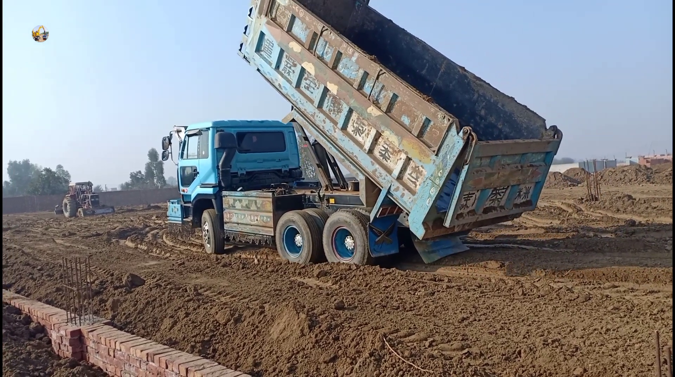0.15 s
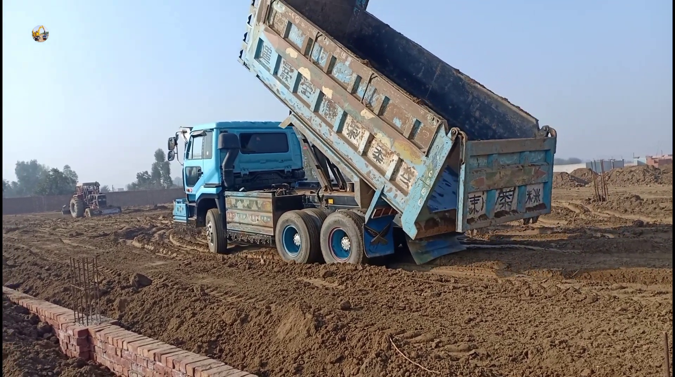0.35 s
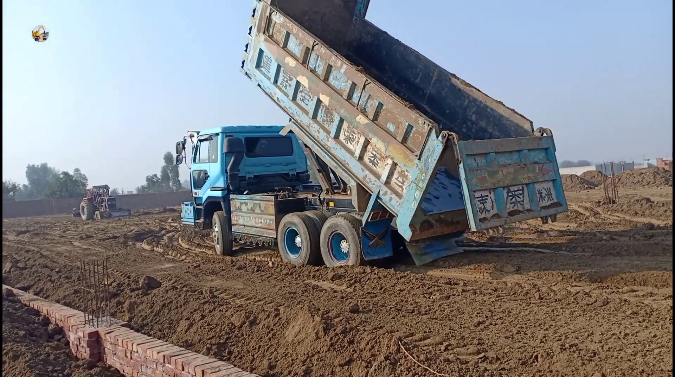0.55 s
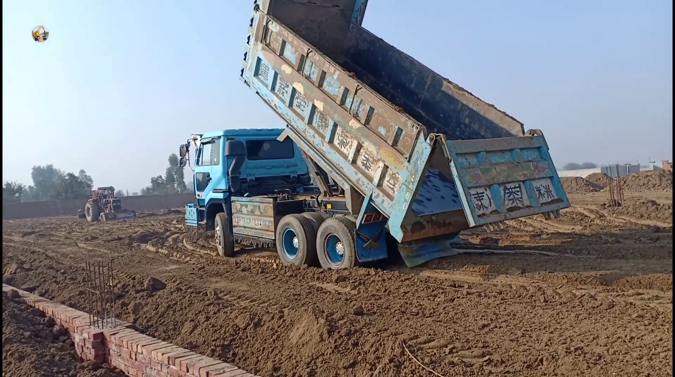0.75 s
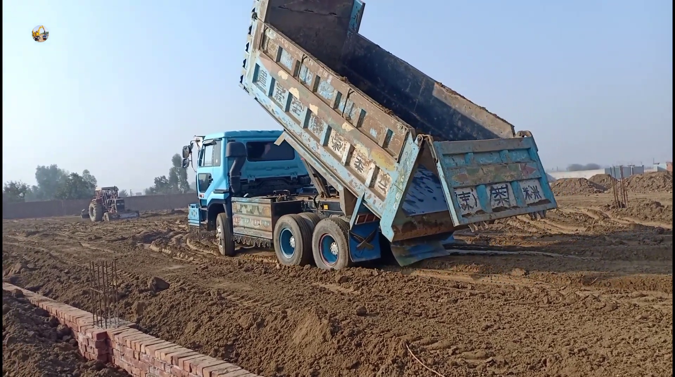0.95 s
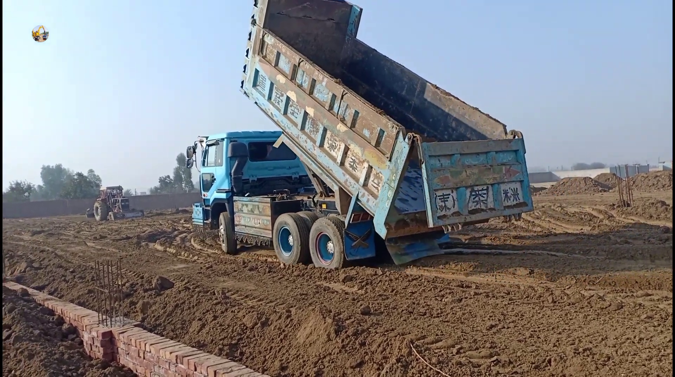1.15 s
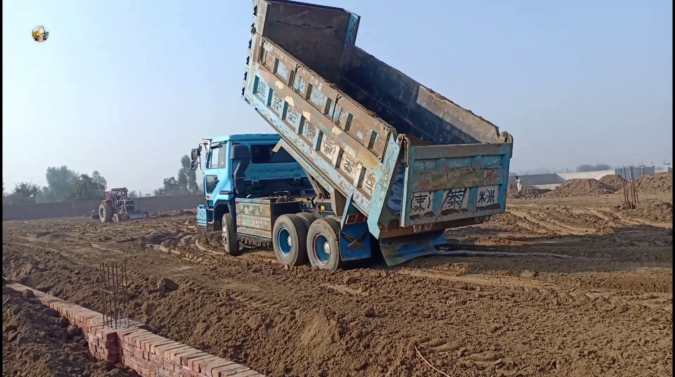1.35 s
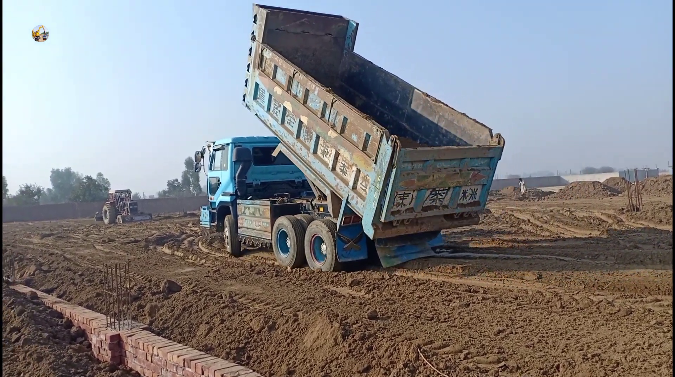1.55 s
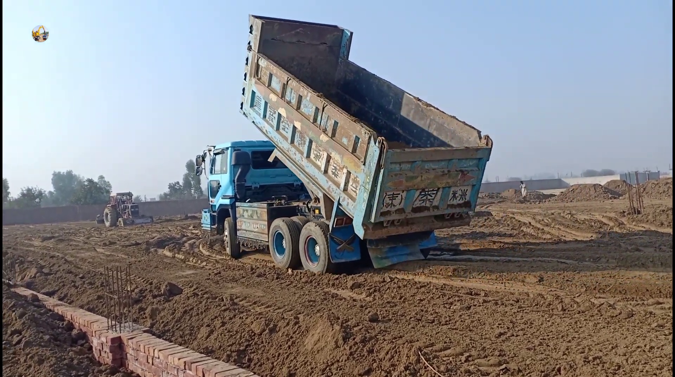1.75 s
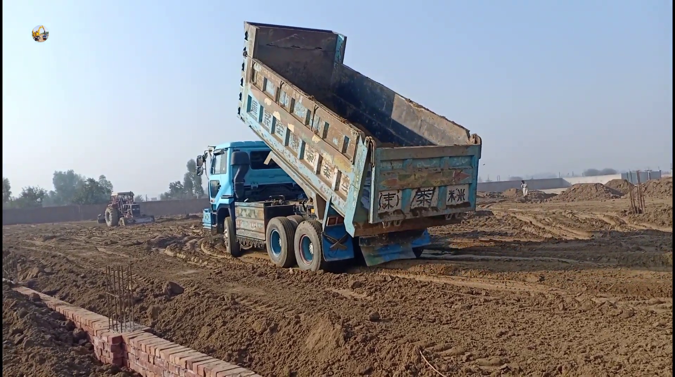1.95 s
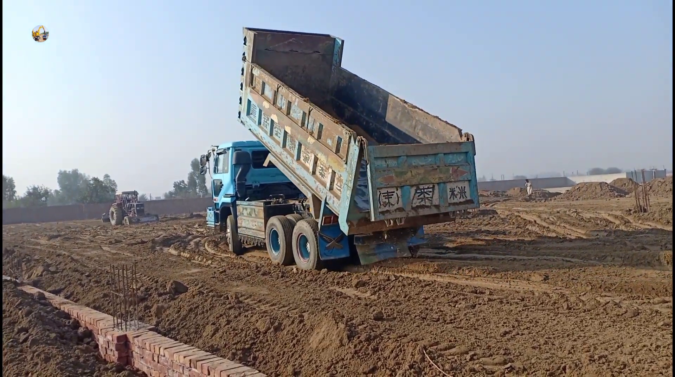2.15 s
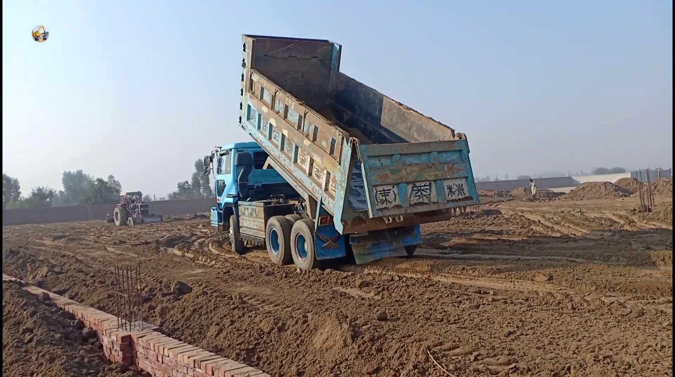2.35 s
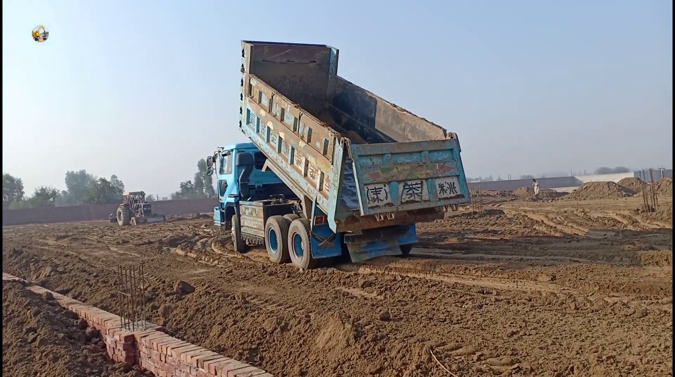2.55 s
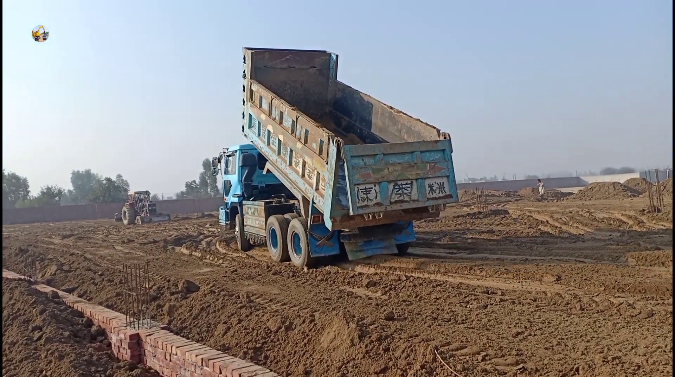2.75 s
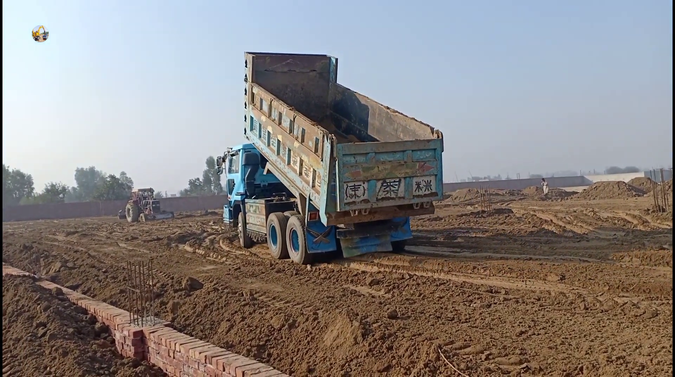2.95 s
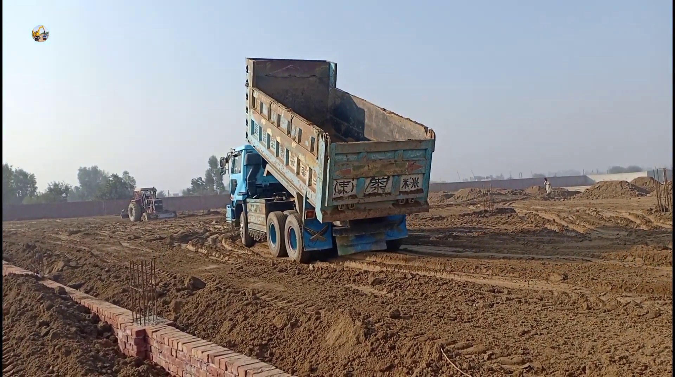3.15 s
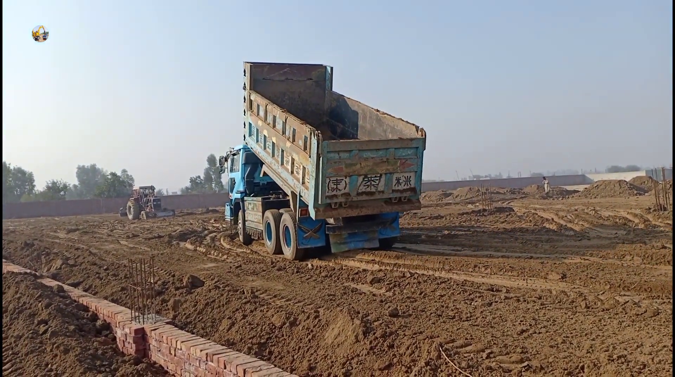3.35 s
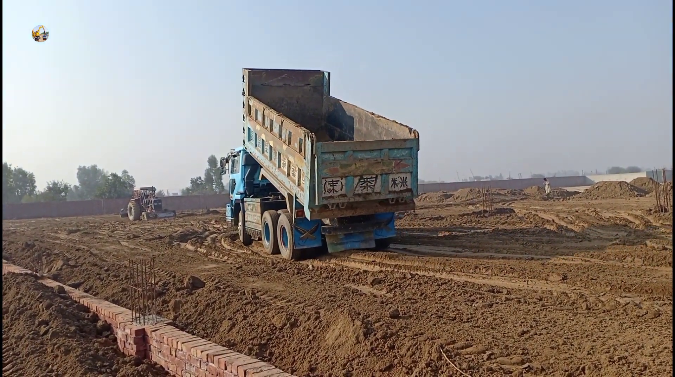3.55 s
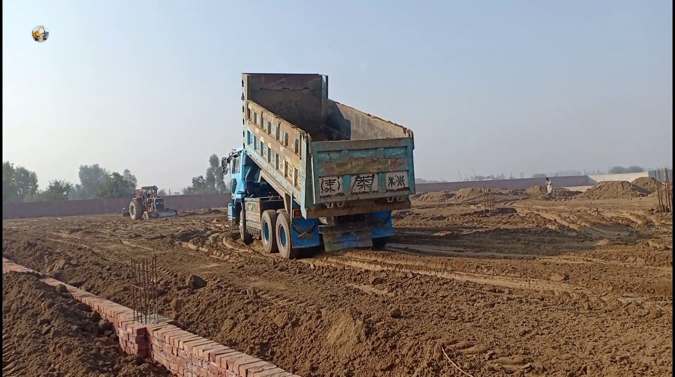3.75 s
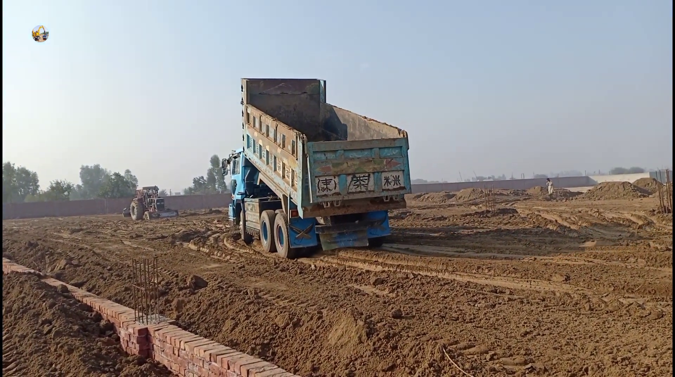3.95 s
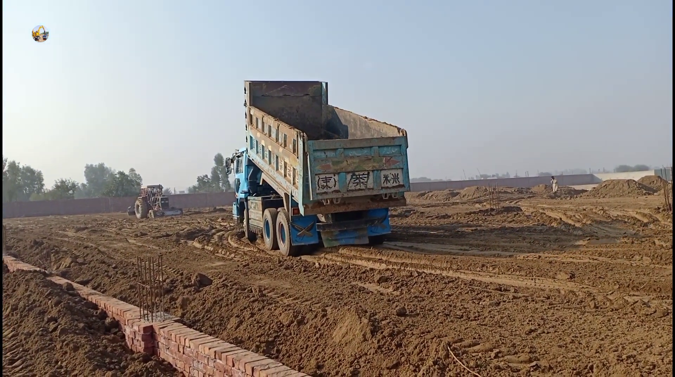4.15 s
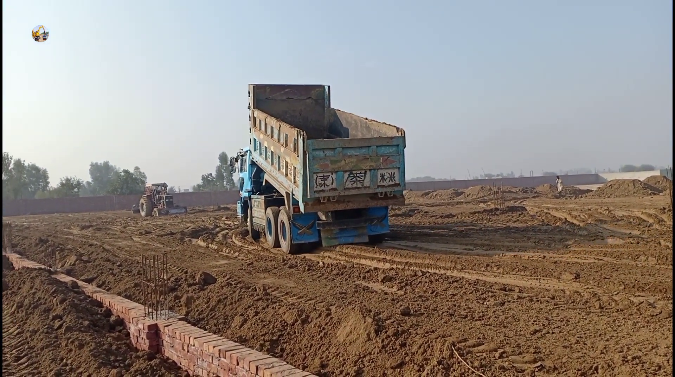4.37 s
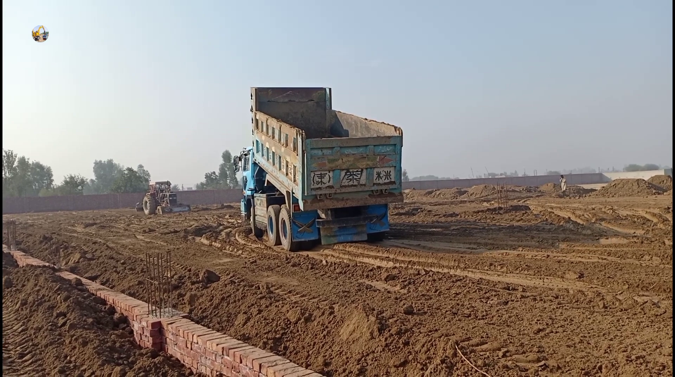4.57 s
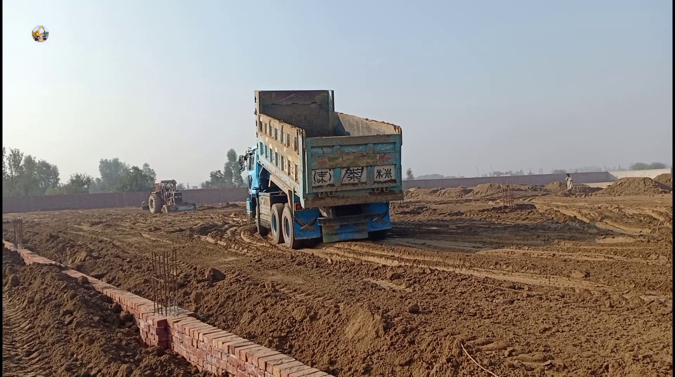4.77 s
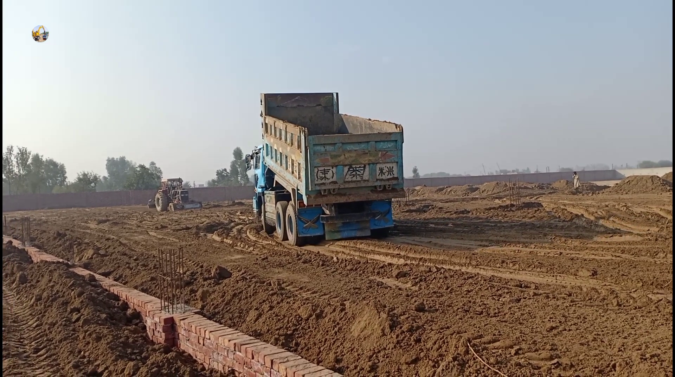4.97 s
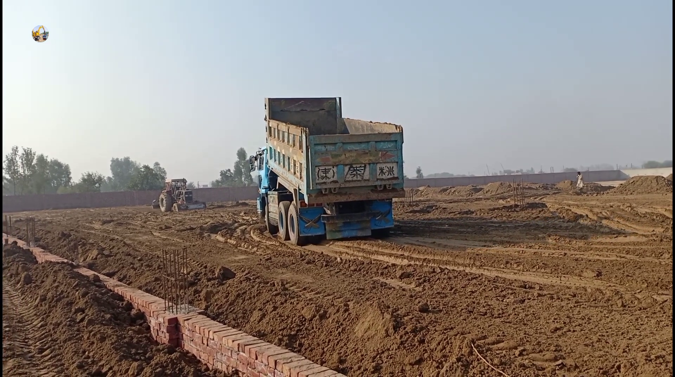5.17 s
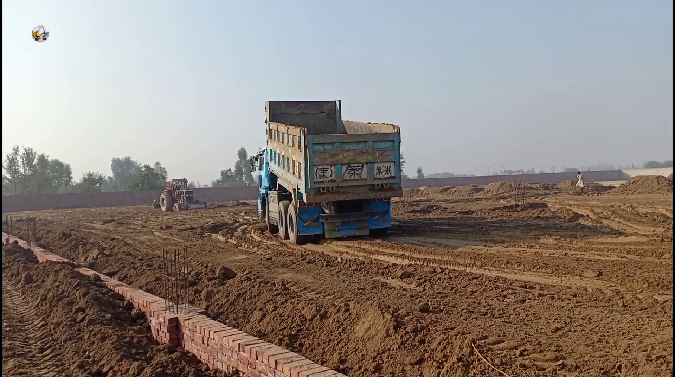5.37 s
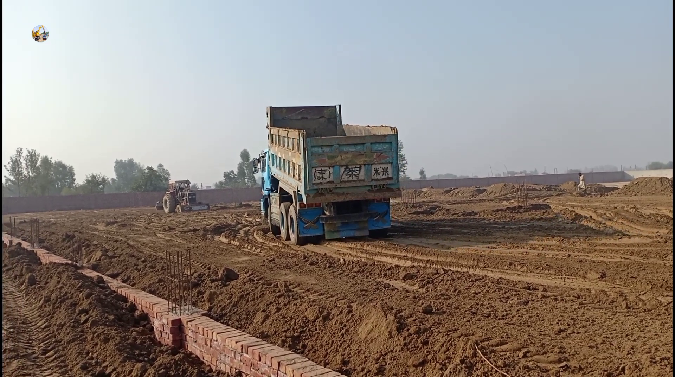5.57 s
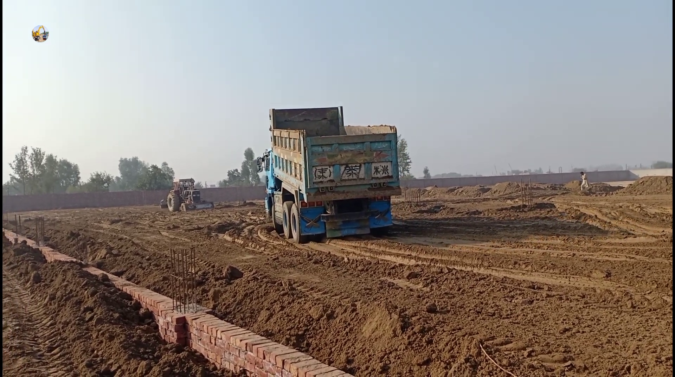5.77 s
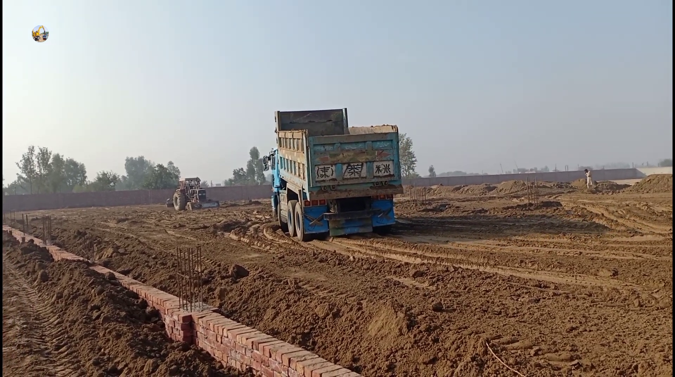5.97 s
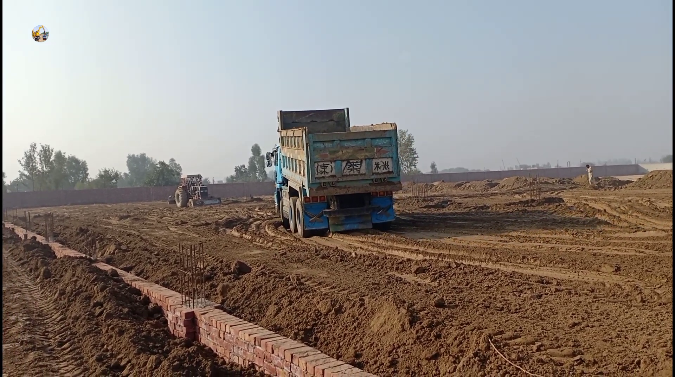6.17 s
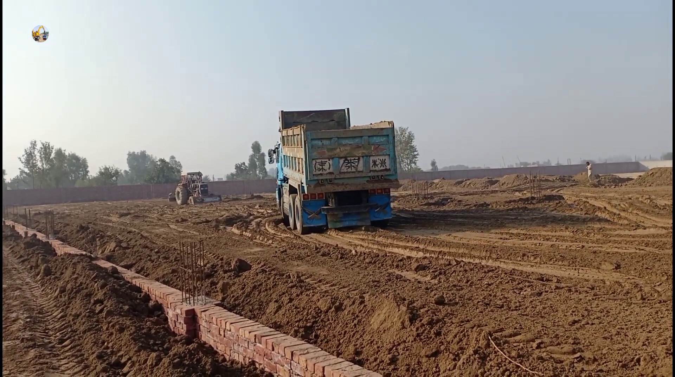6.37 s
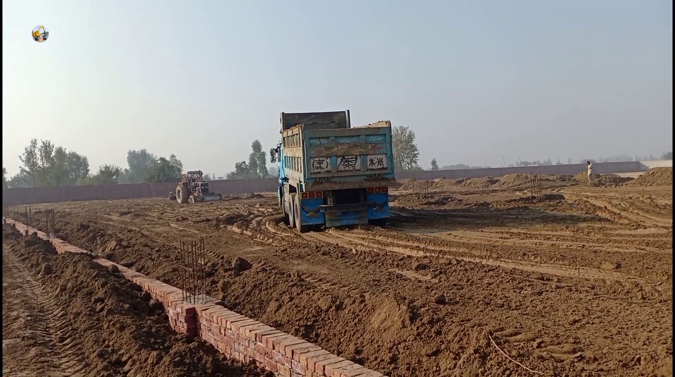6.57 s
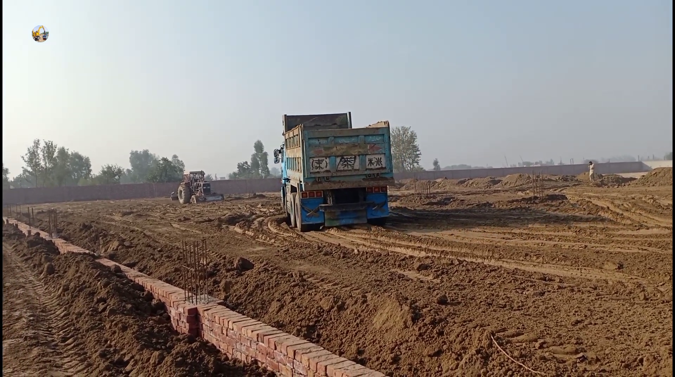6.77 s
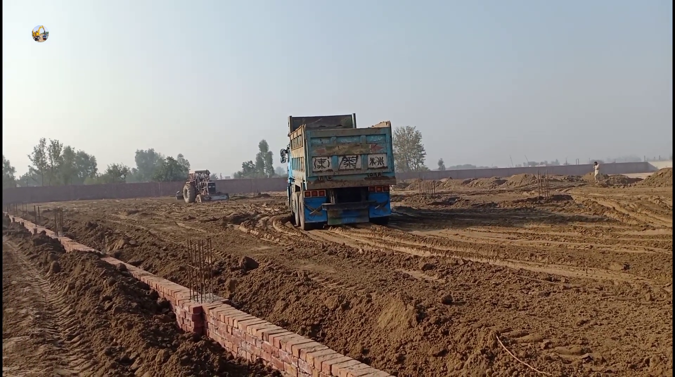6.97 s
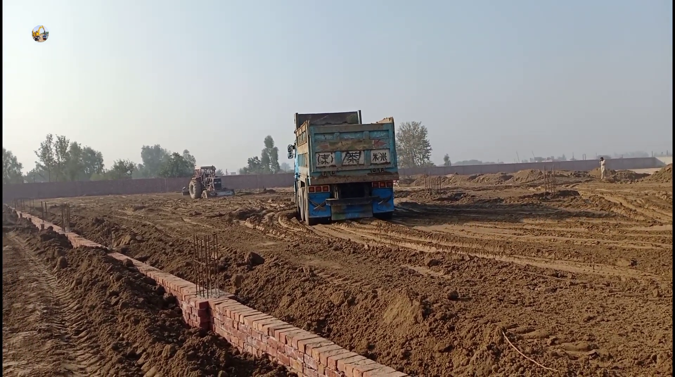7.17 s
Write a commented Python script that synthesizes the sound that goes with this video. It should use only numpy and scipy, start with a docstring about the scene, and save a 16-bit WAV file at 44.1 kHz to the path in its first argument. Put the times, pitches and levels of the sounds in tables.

```python
"""Diesel tipper with a slamming tailgate

An eight-cylinder truck crawls away on a working site: timed firings ring a silencer, over noisy clatter and whine.
The loose steel tailgate slams four times as contacts ring its modes; a far wall returns each slam down a long path.
Chains and latches clank as bursts of banded noise, a faint two-tone hum sets in, and distant machines rumble as noise.
Two microphone ports: the left is open; the right is half covered, dull, and popped twice by a fingertip."""
import sys
import numpy as np
from scipy import signal
from scipy.fft import rfft, irfft
from scipy.io import wavfile
from scipy.ndimage import uniform_filter1d

SR = 44100
rng = np.random.default_rng(int(sys.argv[2]) if len(sys.argv) > 2 else 0)


def how_loud(loudness_db):
    """Turn decibels into a plain amplitude multiplier (0 dB gives 1, 20 dB gives 10)."""
    steps = np.asarray(loudness_db, float) / 20
    return 10 ** steps


def materialize(psi):
    """Save the field psi as 16-bit PCM at rate SR to the path in sys.argv[1].

    A 1-D psi becomes a single channel; in a 2-D psi each row is a channel.
    """
    bounded = np.clip(np.atleast_2d(psi).T, -1, 1)
    quanta = np.round(bounded * 32767).astype(np.int16)
    wavfile.write(sys.argv[1], SR, quanta)


N = 318402


def evened(x):
    """Scales to rms 1."""
    return x / np.sqrt(np.mean(x ** 2) + 1e-20)


def read(points, hz):
    """Reads a table on a log-frequency axis."""
    f, value = np.transpose(points)
    return np.interp(np.log(hz + 1), np.log(f + 1), value)


def add(mix, s, sound):
    """Mixes a sound in at s seconds."""
    part = mix[round(s * SR):][:len(sound)]
    part += sound[:len(part)]


def resonate(x, hz, width):
    """A fixed resonance of gain 1 at its peak."""
    r = np.exp(-np.pi * width / SR)
    return 2 * signal.lfilter([1 - r], [1, -r * np.exp(2j * np.pi * hz / SR)], x).real


def band(x, hz, kind, order=1):
    """Butterworth low or high pass."""
    return signal.sosfilt(signal.butter(order, np.clip(hz, 20, 20000), kind, fs=SR, output="sos"), x)


def coloured(x, points):
    """Shapes the spectrum of x by a table, then scales to rms 1."""
    gain = how_loud(read(points, np.fft.rfftfreq(len(x), 1 / SR)))
    return evened(irfft(rfft(x) * gain, len(x)))


def wander(per_s):
    """Random drift of rms 1, with per_s new values a second joined by straight lines."""
    knots = rng.standard_normal(int(N / SR * 200) + 2)
    at = np.arange(N) / SR * np.clip(per_s, .1, 190)
    return evened(np.interp(at, np.arange(len(knots)), knots))


# the truck turning its tail and pulling away: t/s, exhaust level/dB, clatter level/dB, gear whine level/dB
ENGINE_LEVELS = [(0.0, -39, -40, -39), (1.55, -38, -39.5, -57), (2.7, -39.5, -39.5, -53),
                 (3.3, -39, -39, -71), (4.0, -39.5, -43.5, -46.5), (5.3, -36, -41, -58.5),
                 (6.3, -36.5, -43, -49.5), (7.22, -38, -46.5, -50)]
# engine speed: t/s, cycle rate/Hz
CYCLE_RATE = [(0, 7.491), (0.4, 7.432), (1.2, 7.661), (1.6, 7.614), (2.1, 7.841), (2.7, 8.496),
              (3.2, 8.055), (3.5, 8.006), (4.1, 7.38), (4.7, 7.082), (5.5, 7.121), (6.45, 6.806),
              (7.22, 7.054)]
# cylinders in firing order: puff level/dB, delay down its exhaust branch/ms
CYLINDERS = [(-0.5, 4.4), (3.9, 9.39), (4.2, 3.77), (-5.1, 0.0), (7.8, 9.51), (1.5, 4.75), (-4.1, 8.49),
             (-7.7, 3.3)]
# silencer resonances, each passed twice: f/Hz, width of one pass/Hz, relative level/dB
SILENCER = [(50.0, 16.7, -9.6), (88.6, 31.4, -8.4), (107.2, 26.4, 2.7)]
# steady low engine tones: multiple of the cycle rate, level against the piped puffs/dB
LOW_TONES = [(5, -32), (8, -6.5), (9, -23.5)]
# spectrum of engine clatter: f/Hz, relative level/dB per Hz
CLATTER = [(76, -5), (130, -2.5), (155, -14.5), (179, -13), (312, -9.5), (412, -17), (809, -11.5),
           (986, -18), (1330, -15), (1690, -22), (1980, -13.5), (3590, -22.5), (4040, -15.5), (15000, -88)]
# gear whine: multiple of the cycle rate, level/dB, steady drift in level/dB per s (here none)
WHINE = [(42.7, -4.5, 0), (83, -11, 0)]
TREBLE_DB, DULLING_DB_PER_S = 3.5, -1  # the clatter above 1 kHz dulls with distance


def engine(start_cycle=.76):
    """Eight unequal firings through one silencer, low tones, knock-modulated clatter and a gear whine."""
    t = np.arange(N) / SR
    rate = np.interp(t, *np.transpose(CYCLE_RATE))
    s, *columns = np.transpose(ENGINE_LEVELS)
    exhaust_db, clatter_db, whine_db = (np.interp(t, s, c) for c in columns)
    cycles = start_cycle + np.cumsum(rate) / SR
    firings = len(CYLINDERS) * cycles
    strength_db, delay_ms = np.array(CYLINDERS)[firings.astype(int) % len(CYLINDERS)].T

    at = np.flatnonzero(np.diff(np.floor(firings))) + 1
    # unequal branches space the puffs unevenly: the lumpy eight-cylinder burble
    arrival = at + (delay_ms[at] * SR / 1000).astype(int)
    puffs = np.zeros(N + SR)
    puffs[arrival] = how_loud(strength_db + 0.41 * rng.standard_normal(N))[at]
    pipe = sum(how_loud(db) * resonate(resonate(puffs[:N], hz, w), hz, w) for hz, w, db in SILENCER)
    low_tones = sum(how_loud(db + 3.0 * wander(2.3)) * np.sin(2 * np.pi * k * cycles) for k, db in LOW_TONES)
    exhaust = how_loud(exhaust_db) * (evened(band(pipe, 44, "high", order=2)) + low_tones)

    # each knock starts at a firing and dies away until the next
    knock = np.exp(-(firings % 1) / 0.33) * how_loud(0.33 * strength_db + 8.6 * np.minimum(wander(60), 2))
    clatter = coloured(rng.standard_normal(N) * (1.7 + 0.33 * knock), CLATTER)
    dull = band(clatter, 1000, "low")
    treble = how_loud(TREBLE_DB + DULLING_DB_PER_S * t) * (clatter - dull)
    clatter = how_loud(clatter_db + 0.15 * wander(14)) * (dull + treble)

    drift = np.cumsum(0.0022 * wander(9) * rate) / SR
    whine = 0
    for k, db, drift_db in WHINE:
        level = how_loud(db + drift_db * t + 3.5 * wander(5.8))
        whine = whine + level * np.sin(2 * np.pi * k * (cycles + drift))
    return exhaust + clatter + how_loud(whine_db) * whine


# tailgate slams: t/s, shudder level/dB, shudder length/s, bass gain/dB, gain near 650 Hz/dB, treble gain/dB
SLAMS = [(1.73, -36, 0.13, -7, 6.5, -3.5), (3.323, -36.5, 0.16, -11, 4.5, -0.5),
         (4.744, -39, 0.12, 2.5, 3, -1.1), (5.689, -44, 0.043, 4, 4.5, -0.8)]
# single contacts of gate on frame: t/s, level/dB
BLOWS = [(1.728, -13.5), (1.752, -12.5), (1.78, -17), (1.815, -19.5), (1.848, -19.5), (3.321, -11.5),
         (3.347, -14.5), (3.357, -15.5), (3.395, -19), (3.429, -20), (3.474, -20), (4.742, -15),
         (4.752, -13.5), (4.769, -12.5), (4.8, -18.5), (4.832, -21), (5.696, -20), (5.703, -19.5),
         (5.718, -18), (5.75, -22.5)]
# a slam opens with a dull thud, cracks brightest soon after, then dulls again:
# t/s from 4 ms ahead of the slam, treble level/dB
HARDNESS = [(0.008, -3), (.013, 5), (.08, 5.5), (.16, -8)]


def tailgate(rattles_per_s=450, release_s=0.036, count=3):
    """Each slam is a few hard contacts within a shudder of small ones, all ringing the steel; gives slams, echoes."""
    out, echoes, blows = np.zeros(N), np.zeros(N), np.zeros((count, N))
    when, db = np.transpose(BLOWS)
    # contacts take turns at a few spots
    blows[np.arange(len(when)) % count, (when * SR).astype(int)] = how_loud(db)
    t = np.arange(SR // 2) / SR
    hardness = how_loud(np.interp(t, *np.transpose(HARDNESS)))
    for s, shudder_db, length, bass_db, clang_db, treble_db in SLAMS:
        start = s - .004
        slam = 0
        for spot in blows:
            rattle = rng.standard_normal(len(t)) * (rng.random(len(t)) < rattles_per_s / count / SR)
            swell = np.minimum(t / 0.058, 1) * np.exp(-np.maximum(t - length, 0) / release_s)
            rattle *= how_loud(shudder_db) * swell
            contacts = spot[round(start * SR):][:len(t)]
            ring = steel()
            boom = band(ring, 1400, "low")
            # each contact starts with a bright crack
            crack = 1 + 0.67 * np.exp(-np.arange(len(ring)) / SR / 0.001)
            crash = how_loud(treble_db) * (ring - boom) * crack
            # each slam lands on another part of the frame
            bass = (how_loud(bass_db) - 1) * band(boom, 92, "low")
            clang = (how_loud(clang_db) - 1) * resonate(boom, 650, 230)
            boom = boom + bass + clang
            hits = [contacts + rattle, hardness * contacts + rattle]
            slam = slam + signal.fftconvolve(hits, [boom, crash], axes=1).sum(0)
        add(out, start, slam)
        far_wall(echoes, s, slam[:len(t)], length)
    return out, echoes


# strongest modes of the steel body: f/Hz, relative level/dB, t60/s
BODY = [(89.5, 6.5, 0.043), (152.2, 6.5, 0.47), (239, -15, 1), (329.3, 2, 0.8), (662, -15.5, 1.6),
        (772, 20, 0.057), (871, -32, 0.11)]
# its dense modes: f/Hz, relative level/dB per Hz
PLATE = [(29, -55), (50, -20), (91, 1.5), (130, -7.5), (322, -5.5), (428, -15.5), (674, -9), (1630, -18),
         (2020, -10), (3200, -17), (4100, -15.5), (6660, -38), (11300, -54.5), (15000, -67)]
# decay of the dense modes: f/Hz, t60/s
PLATE_T60 = [(70, 0.43), (250, 0.78), (700, 0.46), (1500, 0.31), (4000, 0.18), (10000, 0.15)]


def steel(modes_db=-4):
    """Response of the body to one blow: dense decaying modes plus the strongest ones."""
    hz, t, z = signal.stft(coloured(rng.standard_normal(SR), PLATE), SR, nperseg=256)
    decay = how_loud(-60 * t / read(PLATE_T60, hz)[:, None])
    dense = signal.istft(z * decay, SR, nperseg=256)[1][:SR]
    t = np.arange(SR) / SR
    ring = sum(how_loud(db - 60 * t / t60) * np.sin(2 * np.pi * (f * t + rng.random())) for f, db, t60 in BODY)
    return (dense + how_loud(modes_db) * ring / abs(ring).max()) * np.minimum(t / 0.0023, 1)


ECHO_DB, ECHO_GAIN_DB_PER_S = -23, 3.5  # at t = 0; the echo grows as the truck nears the wall
ECHO_PATH_M, CLOSING_M_PER_S = 80.8, .8  # extra path by way of the wall at t = 0, shrinking as the truck moves
SOUND_M_PER_S = 343


def far_wall(echoes, s, slam, length):
    """Adds the slam's reflection: its middle band, late by the extra path and shortened."""
    t = np.arange(len(slam)) / SR
    back = resonate(resonate(resonate(slam, 2295, 1400), 2170, 1500), 2100, 1600)
    back = back * np.exp(-t / (0.6 * length))
    back = back * np.clip((t - .009) / .005, 0, 1)  # the dull opening thud is lost on the way
    delay = (ECHO_PATH_M - CLOSING_M_PER_S * s) / SOUND_M_PER_S
    add(echoes, s - .004 + delay, how_loud(ECHO_DB + ECHO_GAIN_DB_PER_S * s) * back)


# latches ringing, band passed three times: t/s, level/dB, f/Hz, width of one pass/Hz, t60/s
CLANKS = [(.862, -49, 5670, 350, 0.087), (6.442, -26.5, 858, 60, 0.097), (6.52, -34, 1000, 910, 0.29)]
# chain links ticking: t/s, level/dB
TICKS = [(.76, -35), (5.498, -43), (6.264, -38.5), (6.342, -43), (6.444, -40), (6.53, -41.5), (6.671, -44)]
TICK_HZ, TICK_WIDTH_HZ, TICK_T60_S = 3900, 2000, .07


def fittings():
    """Latches and chain links: short decaying noise bursts, each ringing in a band."""
    out, t = np.zeros(N), np.arange(SR // 4) / SR
    ticks = [(s, db, TICK_HZ, TICK_WIDTH_HZ, TICK_T60_S) for s, db in TICKS]
    for s, db, hz, width, t60 in list(CLANKS) + ticks:
        fade = how_loud(-60 * t / t60) * np.minimum(t / 0.003, 1)
        burst = rng.standard_normal(len(t))
        for _ in range(3):
            burst = resonate(burst, hz, width)
        burst = burst * fade
        add(out, s, how_loud(db) * burst * np.linalg.norm(fade) / np.linalg.norm(burst))
    return out


# fingertip on the right port: t/s, level/dB
POPS = [(1.7795, -11), (6.8072, -1.2)]


def finger_pops(ring_hz=235):
    """A sharp pressure dip, then the diaphragm swings back."""
    t = np.arange(-100, 1000) / SR
    dip = -np.exp(-(t / np.where(t < 0, .00011, .0002)) ** 2)
    late = np.maximum(t - .0004, 0)
    swing = 1.06 * np.sin(2 * np.pi * ring_hz * late) * how_loud(-60 * late / 0.01)
    out = np.zeros(N)
    for s, db in POPS:
        add(out, s + t[0], how_loud(db) * (dip + swing))
    return out


# the hum's tones: f/Hz, level/dB
HUM = [(347, -57), (697, -56)]
HUM_FROM_S, HUM_RISE_S = 4.16, 0.36


def hum():
    """Two tones, slightly wavering in pitch and level, that set in and stay."""
    t = np.arange(N) / SR
    tones = 0
    for hz, db in HUM:
        phase = 2 * np.pi * np.cumsum(hz + 3.7 * wander(6)) / SR
        tones = tones + how_loud(db + 3.1 * wander(4.4)) * np.sin(phase)
    return np.clip((t - HUM_FROM_S) / HUM_RISE_S, 0, 1) * tones


# spectrum of the distant machines: f/Hz, relative level/dB per Hz
SITE = [(24, -42), (40, -20), (263, -9), (306, -6), (432, -19), (866, -36), (1110, 5.5), (2060, 4),
        (15000, -41)]


def site(level_db=-50):
    """Distant machines as steady coloured noise, drawn afresh for each port."""
    return how_loud(level_db) * coloured(rng.standard_normal(N), SITE)


def under_hand(sound):
    """Leakage beneath the covering hand: the upper band smeared by a short decaying noise tail."""
    leak = rng.standard_normal(1500) * how_loud(-60 * np.arange(1500) / SR / 0.27)
    return signal.oaconvolve(band(sound, 780, "high"), leak / np.linalg.norm(leak))[:N]


def scene():
    """Left port: a direct path and a brighter bounce; covered right port: a dull path and leaks under the hand."""
    slams, echoes = tailgate()
    truck = engine() + slams + fittings() + hum()
    bounce = np.roll(band(truck, 1000, "high", order=2), round(0.001801 * SR))  # 1.8 ms late
    # the shadowed direct path fades above 1.3 kHz, so the comb dips stay low down
    left = band(truck, 1290, "low", order=2) + how_loud(-3.5) * bounce + echoes
    leaked = under_hand(truck)
    dull = band(band(truck + how_loud(-5.5) * leaked, 412, "low"), 1960, "low", order=2)
    right = how_loud(1.23) * dull + how_loud(-25) * leaked
    covered_site = how_loud(-10.0) * band(site(), 2100, "low")
    return np.array([left + site(), right + covered_site + finger_pops()])


DUCK_ABOVE_DB, DUCK_SHARE, RECOVERY_DB_PER_S = -23.5, 0.11, 2.5


def gain_control(heard):
    """Turns both ports down by a share of the level's excess over a threshold, recovering slowly."""
    power_db = 10 * np.log10(abs(uniform_filter1d((heard ** 2).mean(0), 1300)) + 1e-12)
    fall = np.arange(N) / SR * RECOVERY_DB_PER_S
    held_db = np.maximum.accumulate(power_db + fall) - fall
    over_db = np.maximum(held_db - DUCK_ABOVE_DB, 0)
    return heard / how_loud(np.clip(DUCK_SHARE, 0, 1) * uniform_filter1d(over_db, 900))


def top_cut(x):
    """Nothing passes above the cut-off."""
    return signal.sosfilt(signal.butter(12, 15350, fs=SR, output="sos"), x)


def record(dry):
    """The microphone: bass cut, hiss, a treble peak of the capsule, gain control and soft overload."""
    hiss = how_loud(-74.0) * band(rng.standard_normal(dry.shape), 7800, "low")
    heard = band(dry, 63.5, "high", order=2) + hiss
    heard = heard + how_loud(8.5) * resonate(heard, 11650, 1200)
    heard = gain_control(heard)
    mix = np.tanh(heard * 0.94) / 0.87
    return top_cut(mix)


dry = scene()
out = record(dry)
materialize(out)
```